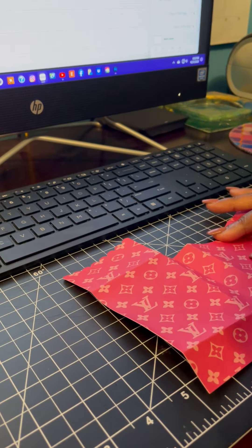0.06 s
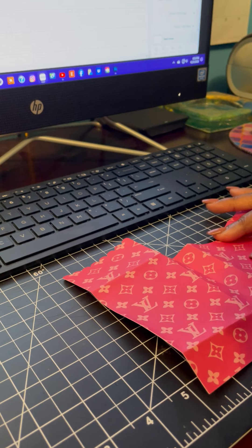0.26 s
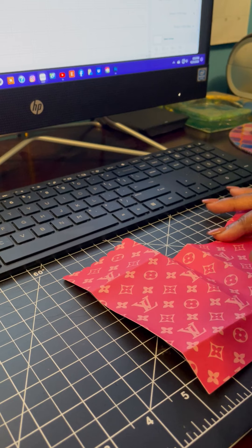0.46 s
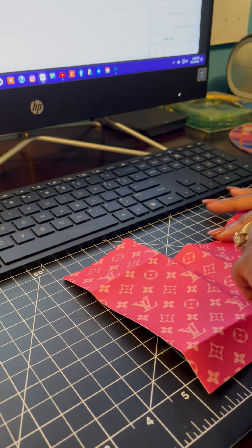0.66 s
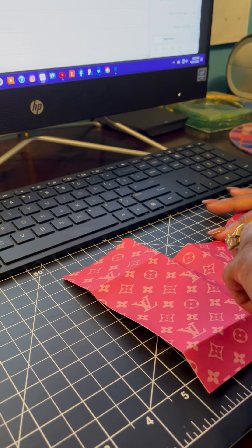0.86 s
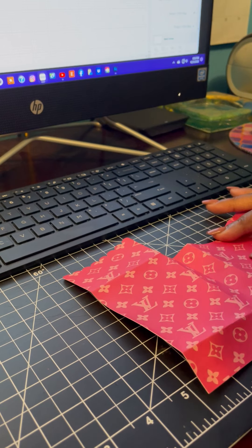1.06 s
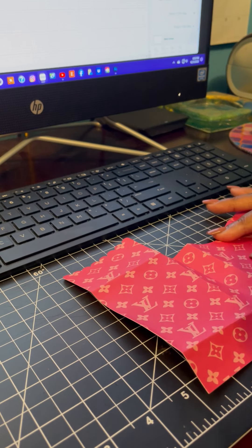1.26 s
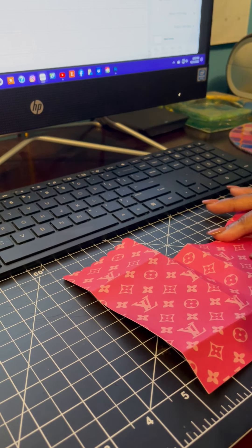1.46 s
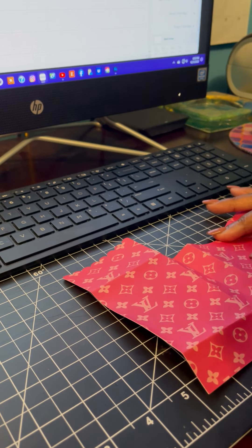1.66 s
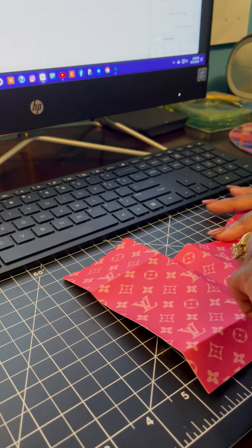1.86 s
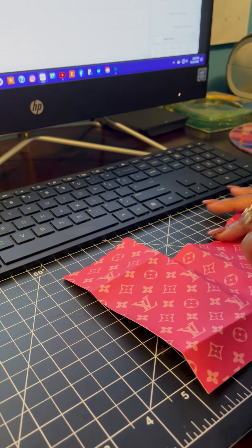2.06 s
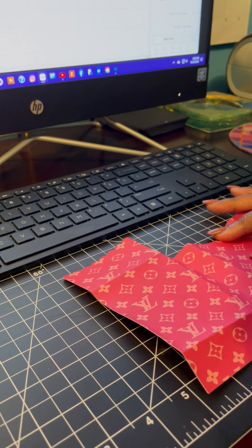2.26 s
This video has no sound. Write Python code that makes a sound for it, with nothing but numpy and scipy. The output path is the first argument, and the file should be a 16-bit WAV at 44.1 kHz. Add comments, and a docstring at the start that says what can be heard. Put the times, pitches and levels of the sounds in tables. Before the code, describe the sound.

Two ticking, rubbing strokes of a tape runner on card, each lifting with a snap.

```python
"""A desk in a quiet room, close to a two-port microphone. Hands bump the desk top, then a small tool,
most likely an adhesive tape runner, is drawn over cardstock on a cutting mat. Its ratchet ticks and
rings the plastic case while the tip rubs the card, and it lifts with a double snap.
Further off, something knocks twice. A second, quicker stroke ends in another double snap,
and a last light tap and bump follow."""
import sys
import numpy as np
from scipy import signal
from scipy.fft import rfft, irfft
from scipy.io import wavfile

SR = 44100
rng = np.random.default_rng(int(sys.argv[2]) if len(sys.argv) > 2 else 0)


def put_to_file(sound):
    """Save the sound as 16-bit audio at rate SR, in the file named by the first command-line argument."""
    columns = np.atleast_2d(sound).T  # one column per channel
    safe = np.clip(columns, -1, 1)
    whole_steps = np.round(safe * 32767)
    wavfile.write(sys.argv[1], SR, whole_steps.astype(np.int16))


N = 101429

# Modes of the tool's plastic case. Each row: frequency in Hz, relative level in dB, T60 in seconds.
CASE_MODES = [(342.6, -22, 0.11), (680, -9.5, .07), (728.5, -3.5, 0.038), (802, -3.5, 0.092),
              (832.7, -5, 0.065), (874, -3, 0.065), (1166, -6, 0.013), (1360, -1.5, 0.016),
              (1668, -6, 0.0097)]


def amp(db):
    """Decibels to gain."""
    return 10 ** (np.asarray(db) / 20)


def unit(x):
    """Scales to rms 1."""
    return x / np.sqrt(np.mean(x ** 2) + 1e-20)


def read(points, hz):
    """Reads a table on a log-frequency axis."""
    f, value = np.transpose(points)
    return np.interp(np.log(hz + 1), np.log(f + 1), value)


def add(mix, s, sound):
    """Mixes a sound in at s seconds."""
    part = mix[max(round(s * SR), 0):][:len(sound)]
    part += sound[:len(part)]


def colour(x, points, size=4096):
    """Causal filter of unit energy with the given spectral shape."""
    log_gain = np.log(amp(read(points, abs(np.fft.fftfreq(size, 1 / SR)))))
    minimum_phase = np.exp(np.conj(signal.hilbert(log_gain)))
    taps = np.fft.ifft(minimum_phase).real[:size // 2]
    return signal.fftconvolve(x, taps / np.linalg.norm(taps))[:len(x)]


def burst(rise_s, decay_s, size=800):
    """A brief chatter of contacts, of unit energy."""
    t = np.arange(size) / SR
    x = rng.standard_normal(size) * (1 - np.exp(-(t / rise_s) ** 2)) * np.exp(-t / decay_s)
    return x / np.linalg.norm(x)


def ring(modes, detune):
    """Dying modes of alternating sign, tuned slightly differently at each blow."""
    t, out = np.arange(SR // 3) / SR, 0
    for k, (hz, db, t60) in enumerate(modes):
        pitch = hz * (1 + detune * rng.standard_normal())
        out = out + (-1) ** k * amp(db - 60 * t / t60) * np.sin(2 * np.pi * pitch * t)
    return out


def spread(a, b, likeness):
    """Left and right from two unrelated signals."""
    return np.sqrt((1 + likeness) / 2) * a + np.sqrt((1 - likeness) / 2) * np.array([b, -b])


def room_tone(level_db=-63.5):
    """The room's low steady background, nearly the same at both ports."""
    # Spectrum of the background. Each row: frequency in Hz, relative level in dB.
    spectrum = [(20, -12), (40, 8.5), (75, -0.5), (130, -5.5), (250, -10.5), (345, -9), (480, -24.5),
                (750, -22.5), (1200, -33), (3000, -41.5), (6000, -44), (8000, -58.5), (12000, -56),
                (16000, -63)]
    a, b = (unit(colour(z, spectrum)) for z in rng.standard_normal((2, N)))
    return amp(level_db) * spread(a, b, likeness=.996)


def desk(rumble_db=-1):
    """Soft bumps ring the desk top, and the moving hand rumbles through it."""
    # Bumps of the hands. Each row: start in seconds, level in dB.
    bumps = [(0.019, -51), (0.144, -46), (0.223, -47.5), (.578, -43.5), (0.92, -41.5), (0.939, -48.5),
             (2.012, -51), (2.019, -48.5), (2.296, -48.5)]
    # Modes of the desk. Each row: frequency in Hz, relative level in dB, T60 in seconds.
    modes = [(108, -9, 0.1), (132, -12, .2), (175.7, -2.5, 0.1), (257.5, -3, 0.16), (343, -1, .14),
             (470, -6, .04), (620, -8.5, 0.05)]
    # Weight of the hand. Each row: time in seconds, relative rumble level in dB.
    pressure = [(0.0, -54.5), (0.03, -52), (0.08, -63), (0.15, -54.5), (0.21, -72), (0.24, -47),
                (0.54, -60), (0.58, -50), (0.75, -54.5), (0.88, -64), (0.93, -59), (1.2, -82),
                (1.73, -49.5), (2.0, -65.5), (2.04, -57), (2.14, -80), (2.28, -75), (2.3, -55.5)]
    # Spectrum of the rumble. Each row: frequency in Hz, relative level in dB.
    spectrum = [(20, -26), (42, -6.5), (70, -2.5), (92, -2), (108, 5), (134, 5.5), (155, -13), (260, -11),
                (500, -37.5)]
    thuds = np.zeros(N)
    for s, db in bumps:
        add(thuds, s, amp(db) * ring(modes, detune=.01))
    weight = amp(rumble_db + np.interp(np.arange(N) / SR, *np.transpose(pressure)))
    return thuds + weight * unit(colour(rng.standard_normal(N), spectrum))


def ratchet(rise_s=.0006, echo_s=.0021, echo_db=-12, case_lag_s=.002):
    """Each tooth gives a bright tick, echoed by the desk, and kicks the case into ringing."""
    # Ratchet teeth. Each row: time in seconds, relative levels of tick and case ring in dB.
    teeth = [(0.0148, -58, -40), (0.2434, -41.5, -42), (0.2663, -29, -39.5), (0.284, -28.5, -45.5),
             (0.3089, -28.5, -38), (0.3474, -47, -39.5), (0.381, -30, -39.5), (0.4022, -28, -37),
             (0.4252, -28.5, -43), (0.4433, -28, -37), (0.4584, -26, -43), (0.475, -26.5, -48),
             (0.4969, -28.5, -39), (0.5151, -28, -41.5), (0.5303, -25, -51), (0.548, -27, -52),
             (0.5654, -30, -43), (0.582, -29.5, -67), (0.5962, -33, -62), (0.6118, -31.5, -42),
             (0.6246, -37, -51), (0.6361, -32.5, -41), (0.6494, -35.5, -65), (0.6637, -33.5, -54),
             (0.6774, -34, -39), (0.6907, -32.5, -53), (0.7074, -41, -44.5), (0.7238, -43, -45.5),
             (0.743, -48, -52), (0.7651, -51, -67), (0.7825, -49, -41.5), (0.8046, -61, -79),
             (0.8227, -50, -43.5), (1.4902, -50.5, -44), (1.5109, -50, -40), (1.5176, -31, -40),
             (1.5387, -26.5, -47), (1.5535, -26.5, -39), (1.5688, -30.5, -37.5), (1.5867, -28.5, -39),
             (1.6007, -30.5, -37), (1.6137, -39.5, -36.5), (1.6259, -38.5, -36), (1.6385, -35, -58),
             (1.6484, -30.5, -38), (1.6575, -38, -35), (1.6682, -30.5, -44), (1.678, -36, -38),
             (1.6872, -31, -47), (1.6979, -31, -36), (1.7087, -41, -43), (1.7174, -38, -37),
             (1.7261, -34.5, -37), (1.7348, -31.5, -40), (1.7442, -31, -34.5), (1.7532, -33.5, -39),
             (1.7632, -30.5, -40.5), (1.7737, -32.5, -50), (1.7835, -31.5, -39), (1.7937, -29, -37),
             (1.8063, -29, -42), (1.8194, -25.5, -43.5), (1.8353, -26, -43), (1.8721, -25.5, -59)]
    # Spectrum of a tick. Each row: frequency in Hz, relative level in dB.
    spectrum = [(200, -41.5), (800, -26), (1500, -19.5), (2200, -24), (3200, -19.5), (4000, -12.5),
                (5300, -10.5), (6500, -6.5), (8000, -17.5), (9000, -2.5), (9900, -8), (11000, -4),
                (12000, -7), (13000, -6), (14300, -8.5), (15400, 6.5), (16200, -16.5)]
    ticks, case = np.zeros((2, N))
    for s, tick_db, case_db in teeth:
        tick = amp(tick_db) * np.sqrt(160) * burst(rise_s, decay_s=.0007)  # level over 160 samples
        add(ticks, s - rise_s / 2, tick)
        add(ticks, s + echo_s, amp(echo_db) * tick)
        add(case, s + case_lag_s * rng.random(), amp(case_db) * ring(CASE_MODES, detune=.02))
    return amp(-4) * colour(ticks, spectrum) + amp(-1) * case


def snaps(rise_s=.0003, crack_s=.00028):
    """Plastic cracks, rattles and rings the case; the shorter the rattle, the cleaner the crack."""
    # Snaps and light taps. Each row: start in seconds, level in dB, rattle decay in seconds,
    # top treble in dB, case ring level in dB.
    hits = [(.0157, -51.5, 0.002, -15, -59.5), (0.133, -66.5, 0.0019, -9, -53.5),
            (0.1796, -51.5, 0.0012, 16, -57.5), (0.22, -71, .002, -5, -54.5),
            (0.894, -55.5, .001, 3.5, -68), (0.9169, -28.5, 0.0011, 5, -36), (0.9361, -26, .0004, -10, -44),
            (1.3125, -61.5, 0.00042, 1.5, -81.5), (1.4588, -54, 0.00044, 6.5, -72),
            (1.995, -56.5, 0.006, -8, -54.5), (2.0103, -31, .0015, 3.5, -37), (2.0188, -38, .0008, 7, -42),
            (2.032, -36.5, 0.00029, -10, -46), (2.287, -64, 0.00207, -6, -59)]
    # Spectrum of a snap. Each row: frequency in Hz, relative level in dB.
    spectrum = [(100, -12.5), (400, -8), (1000, -2), (1900, -5.5), (2600, -0.5), (4400, -3), (6000, 2.5),
                (8000, -10.5), (9500, -6.5), (11000, -16.5), (15500, -14.5), (16500, -25.5)]
    cracks, case = np.zeros((2, N))
    for s, db, rattle_s, top_db, case_db in hits:
        clean_share = np.exp(-(rattle_s / crack_s) ** 2 / 2)
        snap = np.sqrt(1 - clean_share) * burst(rise_s, rattle_s)
        add(snap, rise_s / 2, np.sqrt([clean_share]))  # the crack is a single impulse
        snap = colour(snap, [(7500, 0.00073), (12000, top_db)])
        add(cracks, s, amp(db) * np.sqrt(160) * snap)  # level over 160 samples
        add(case, s, amp(case_db) * ring(CASE_MODES, detune=.04))
    return colour(cracks, spectrum) + case


def grains(per_s=2500, spread_db=4):
    """Dense tiny slips of uneven size."""
    size = amp(spread_db * np.minimum(rng.exponential(1, N), 4))
    return unit(size * rng.standard_normal(N) * (rng.random(N) < per_s / SR))


def rubbing():
    """The tip drags over the card: a papery body and a fine hiss."""
    # One curve per stroke. Each row: time in seconds, relative levels of body and hiss in dB.
    strokes = [
        [(0.215, -51, -91), (0.229, -73, -90), (0.243, -46, -68), (0.257, -68, -73), (0.267, -42, -52),
         (0.365, -64, -52), (0.387, -52.5, -47.5), (0.635, -45.5, -46), (0.855, -62.5, -88), (0.88, -52.5, -78)],
        [(1.48, -73, -70.5), (1.494, -50.5, -51), (1.504, -54, -54), (1.514, -46.5, -62.5), (1.568, -47.5, -35),
         (1.622, -45, -59), (1.644, -43, -41), (1.788, -43, -47), (1.868, -62, -45.5), (1.95, -74, -59)],
    ]
    # Spectra of the friction. Each row: frequency in Hz, relative level in dB.
    body_spectrum = [(100, -10.5), (300, -6.5), (500, -8), (650, 1.5), (790, 7.5), (1050, -6), (1450, -4),
                     (2100, -11), (2700, -9.5), (3300, -16.5), (6000, -22)]
    hiss_spectrum = [(1500, -33.5), (3200, -3), (5000, -1.5), (6500, 0.5), (8000, -14), (11000, -4),
                     (15500, -10), (16500, -25.5)]
    t, body_level, hiss_level = np.arange(N) / SR, 0, 0
    for stroke in strokes:
        s, body_db, hiss_db = np.transpose(stroke)
        moving = (t > s[0]) & (t < s[-1])
        body_level = body_level + moving * amp(np.interp(t, s, body_db))
        hiss_level = hiss_level + moving * amp(np.interp(t, s, hiss_db))
    body = colour(body_level * grains(), body_spectrum)
    hiss = colour(hiss_level * grains(), hiss_spectrum)
    return amp(-3.5) * body + amp(-12.5) * hiss


def scrape(x, width_hz=780):
    """Adds a scraping resonance that sinks towards the end of each stroke."""
    # Path of the resonance. Each row: time in seconds, centre in Hz, gain of the added band in dB.
    path = [(.26, 6400, -22.5), (.52, 6260, 8), (.59, 4800, 12.5), (.65, 5100, 11.5), (.74, 4450, 5),
            (1.5, 5550, -2), (1.68, 5330, 3.5), (1.77, 6240, 12.5), (1.83, 5400, 1), (1.88, 4640, -2.5)]
    s, hz, db = np.transpose(path)
    t = np.arange(N) / SR
    carrier = np.exp(2j * np.pi * np.cumsum(np.interp(t, s, hz)) / SR)
    pole = np.exp(-np.pi * width_hz / SR)
    # Shift the band down to 0 Hz, smooth it, shift it back.
    band = 2 * (carrier * signal.lfilter([1 - pole], [1, -pole], x / carrier)).real
    return x + amp(np.interp(t, s, db)) * band


def far_knocks(rise_s=.0032, t60_s=.37):
    """Dull knocks further off, reaching the microphone almost wholly as room sound."""
    # The two knocks. Each row: start in seconds, level in dB.
    knocks = [(1.337, -43), (1.4, -47.5)]
    # Spectrum of a knock. Each row: frequency in Hz, relative level in dB.
    spectrum = [(100, -16), (250, -7), (420, 1.5), (800, 1), (1500, -3), (2600, -5), (3300, -16.5),
                (5400, -23.5), (9000, -51), (14000, -45)]
    t, power = np.arange(SR // 2) / SR, np.zeros(N)
    for s, db in knocks:
        envelope = amp(db - 60 * t / t60_s) * np.minimum(t / rise_s, 1)
        add(power, s, envelope ** 2)
    a, b = (colour(np.sqrt(power) * z, spectrum) for z in rng.standard_normal((2, N)))
    return spread(a, b, likeness=.45)


def ports(x):
    """A near sound reaches the two microphone ports with a small lag and at unequal levels."""
    # Phase between the ports. Each row: frequency in Hz, lead of the left in radians.
    phase = [(0, -3.5), (200, 0.8), (1100, 0.82), (2200, 0), (3000, 1.37), (5000, 0.78), (6400, 2.1),
             (7700, 2.5), (9500, 5), (11000, 7), (12500, 8), (14300, 9.5), (16000, 9.5)]
    # Balance of the ports. Each row: frequency in Hz, left minus right in dB.
    balance = [(100, 0), (350, 0.5), (800, -2), (1500, -2.3), (2500, 0.5), (4500, -1.5), (6000, 0.5),
               (16000, -0.5)]
    hz = np.fft.rfftfreq(2 * N, 1 / SR)
    half = amp(read(balance, hz) / 2) * np.exp(.5j * read(phase, hz))
    return irfft(rfft(x, 2 * N) * np.array([half, 1 / half]))[:, :N]


def room(x, wet_db, delay_s=.0026, early_db=-10, early_t60_s=.014):
    """At the microphone: direct sound, scatter from things on the desk, and the room's short tail."""
    # Decay of the room. Each row: frequency in Hz, T60 in seconds.
    decay = [(150, .3), (600, 0.48), (1500, 0.21), (4000, 0.27), (7000, 0.22), (11000, 0.26), (16000, 0.11)]
    # Spectrum of the tail at its start. Each row: frequency in Hz, relative level in dB.
    spectrum = [(100, 5.5), (800, -7), (2500, 3), (6000, -6), (10000, -4.5), (16000, 0)]
    hz, t, bands = signal.stft(rng.standard_normal((2, SR // 2)), SR, nperseg=256)
    bands = bands * amp(read(spectrum, hz)[:, None] - 60 * t / read(decay, hz)[:, None])
    tail = signal.istft(bands, SR, nperseg=256)[1]
    t = np.arange(tail.shape[1]) / SR
    tail = tail * (t > delay_s)
    early = rng.standard_normal(tail.shape) * amp(-60 * t / early_t60_s) * (t > delay_s / 2)
    echoes = amp(wet_db) * tail / np.linalg.norm(tail[0])
    echoes += amp(early_db) * early / np.linalg.norm(early[0])
    reflected = signal.fftconvolve(x[None], echoes, axes=1)[:, :N]
    left, right = x + spread(*reflected, likeness=.45)
    return np.array([ports(left)[0], ports(right)[1]])


def scene():
    """Tool and desk close to the microphone, the knocks and the room behind them."""
    strokes = room(scrape(ratchet() + rubbing()), wet_db=-8.5)
    return strokes + room(snaps(), wet_db=-9) + desk() + far_knocks() + room_tone()


def record(dry, low_cut_hz=33, edge_hz=16300):
    """The recorder's low cut and band limit."""
    low_cut = signal.butter(4, low_cut_hz, "high", fs=SR, output="sos")
    band_limit = signal.firwin(255, edge_hz, window=("kaiser", 8), fs=SR)
    return signal.oaconvolve(signal.sosfilt(low_cut, dry), band_limit[None], "same")


dry = scene()
out = record(dry)
put_to_file(out)
```